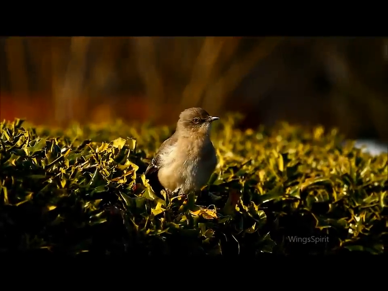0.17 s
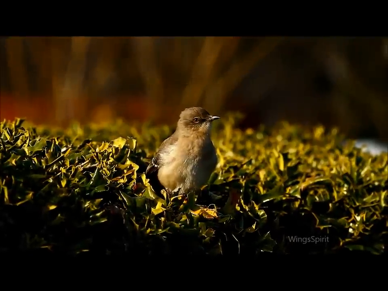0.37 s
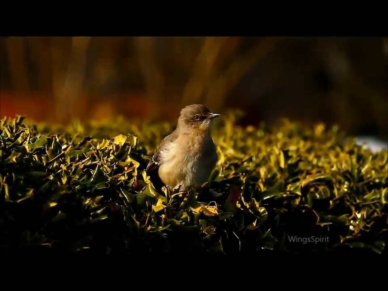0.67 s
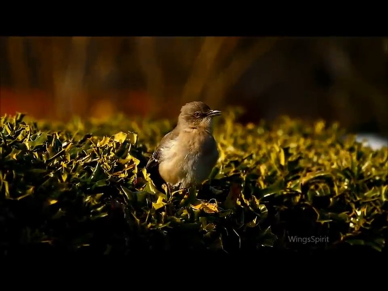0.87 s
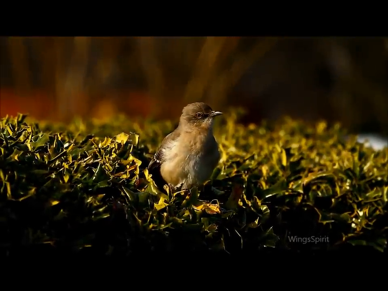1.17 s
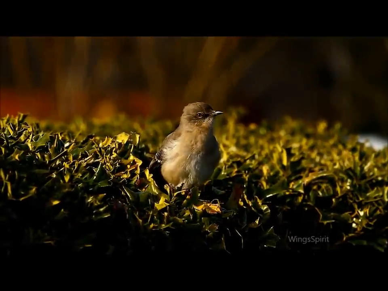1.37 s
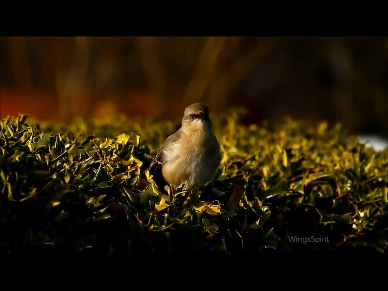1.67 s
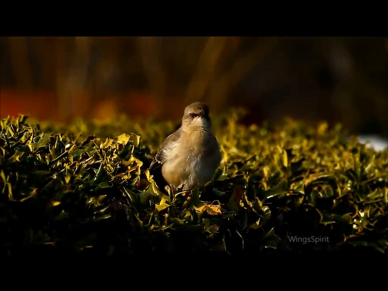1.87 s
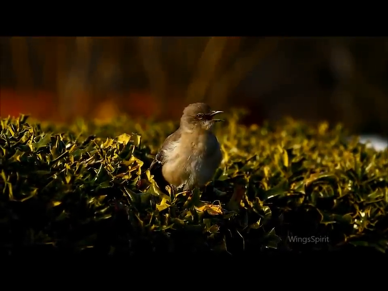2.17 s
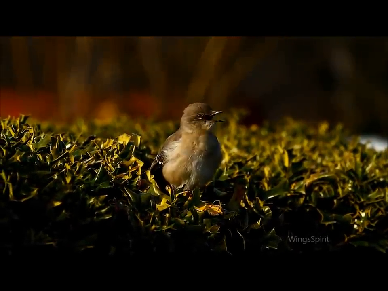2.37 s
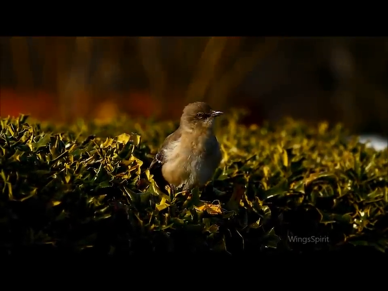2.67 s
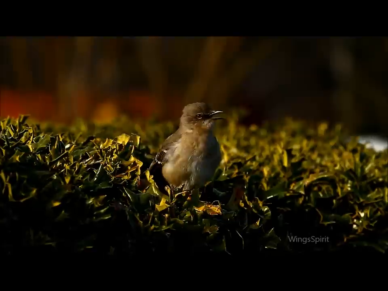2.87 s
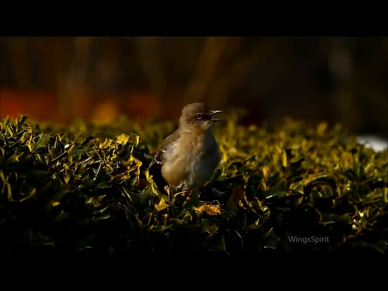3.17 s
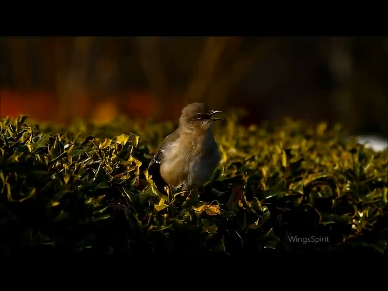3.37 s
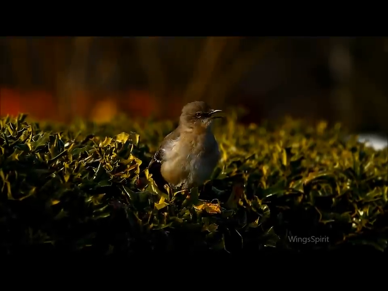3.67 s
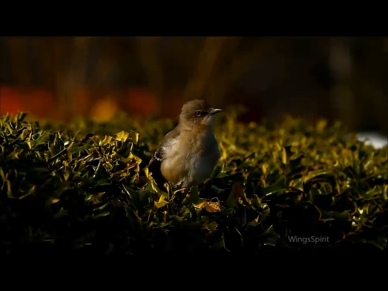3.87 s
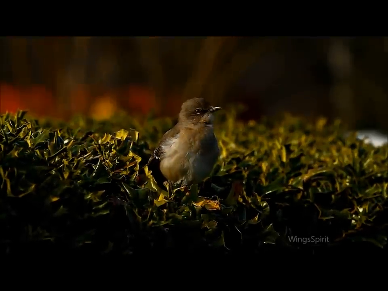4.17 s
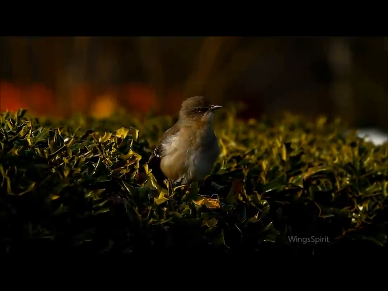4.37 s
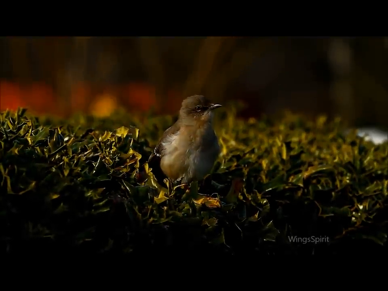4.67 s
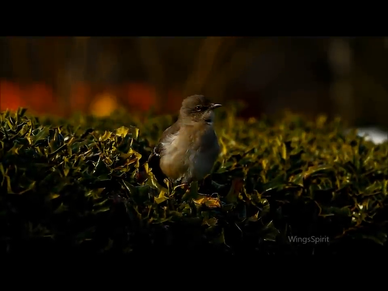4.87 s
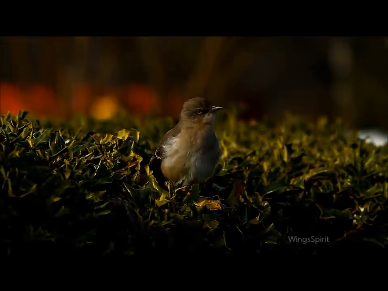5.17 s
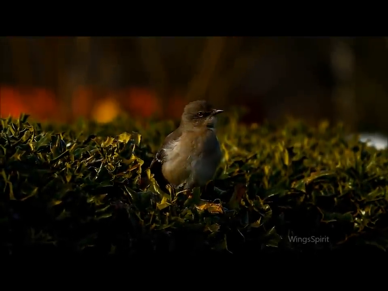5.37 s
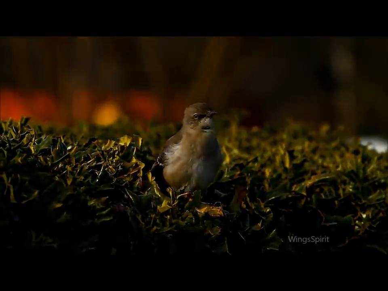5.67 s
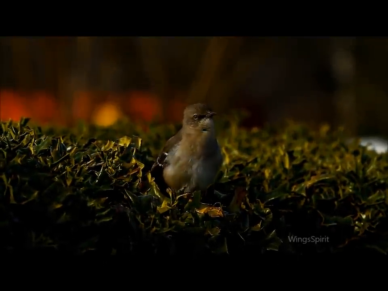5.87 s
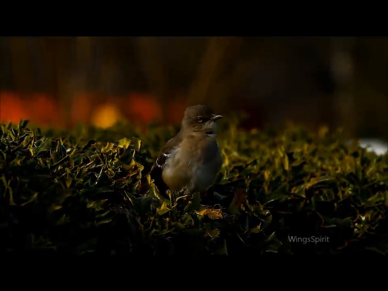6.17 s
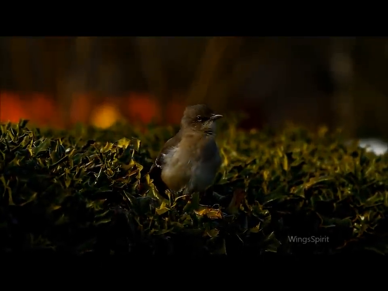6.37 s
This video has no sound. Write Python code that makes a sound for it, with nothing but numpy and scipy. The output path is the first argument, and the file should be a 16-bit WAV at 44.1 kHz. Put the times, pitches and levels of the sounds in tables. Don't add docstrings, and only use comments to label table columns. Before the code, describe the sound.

A close mockingbird sings from a hedge outdoors, over low traffic hum and wind rumble that weaken throughout. Very short, sharp falling chips sound at about 0.05, 0.35, 0.75, 1.25 and 1.55 seconds, with slurred whistles at 0.9-1.15 and 1.7-1.9. Wind thumps the microphone softly at 0.5-1.05; tiny twig ticks come near 0.6, and a thin, very high brake squeal swells around 1.4-1.5 and 1.8. From 2.0 to 3.8, five phrases of rapid, bright, arched pips follow, the first four ending in a downward slide. Light wind thumps return around 4.0-4.4. Two lower, husky fluttering warbles come at 4.1 and 4.5, then clear little coos leading into purrs at 4.9, 5.4 and 5.75. A twig snaps at 5.2. Two swooping, bouncing trills finish at 6.0-6.3 and 6.4-6.55, with a short leafy echo.

```python
import sys
import numpy as np
from scipy import signal
from scipy.io import wavfile
from scipy.ndimage import uniform_filter1d

SR = 44100
rng = np.random.default_rng(int(sys.argv[2]) if len(sys.argv) > 2 else 0)


def amplitude_ratio(level_db):
    exponent = np.asarray(level_db, float) / 20
    return 10 ** exponent


def int16_out(signal):
    q = np.round(np.clip(np.atleast_2d(signal).T, -1, 1) * 32767)
    wavfile.write(sys.argv[1], SR, q.astype(np.int16))


N = 287532

CHIP_PARTIALS = [-15, -22, -38]
LOW_VOICE_PARTIALS = [-23, -35.5, -45, -32, -40.5, -39]


def rms_one(x):
    return x / np.sqrt(np.mean(x ** 2) + 1e-20)


def drift(rate):
    r = np.exp(-80 * np.pi * rate / SR)
    slow = signal.lfilter([1], [1, -2 * r, r * r], rng.standard_normal(N // 40 + 2002))[2000:]
    return np.interp(np.arange(N) / 40, np.arange(len(slow)), rms_one(slow))


def coloured(spectrum, patchy_db):
    hz, level_db = np.transpose(spectrum)
    edges = np.geomspace(hz[0], hz[-1], round(3 * np.log2(hz[-1] / hz[0])))
    white = rng.standard_normal((2, N))
    together = drift(1.7)
    out = 0
    for k, (low, high) in enumerate(zip(edges, edges[1:])):
        bandpass = signal.butter(2, [low, high], "band", fs=SR, output="sos")
        band = signal.sosfilt(bandpass, white[k % 2])
        centre_db = np.interp(np.log(low * high) / 2, np.log(hz), level_db)
        flicker_db = patchy_db * (0.53 * together + drift(8.8))
        out = out + band * amplitude_ratio(centre_db + flicker_db)
    return rms_one(out)


def resonance(x, hz, width):
    r = np.exp(-np.pi * width / SR)
    poles = [1, -2 * r * np.cos(2 * np.pi * hz / SR), r * r]
    return signal.lfilter([(1 - r * r) / 2, 0, (r * r - 1) / 2], poles, x + 1e-18)


def add(track, start_s, piece):
    i = round(start_s * SR)
    track[i:i + len(piece)] += piece[:N - i]


def traffic_level_db():
    # (time [s], level [dB])
    departure = [(0, -32), (.6, -33), (1.07, -34.5), (1.8, -35), (2.65, -37.5), (3.43, -37.5), (3.7, -41),
                 (4.0, -38), (5.1, -39.5), (5.9, -43), (6.52, -43.5)]
    return np.interp(np.arange(N) / SR, *np.transpose(departure))


def traffic():
    # (frequency [Hz], density [dB per Hz])
    spectrum = [(120, -20.5), (200, -3.5), (300, -5.5), (668, -3.5), (929, -1.5), (1240, -6), (1730, -8.5),
                (2230, -17.5), (4990, -29), (5470, -33.5), (15800, -43.5)]
    return amplitude_ratio(traffic_level_db() + 1.5) * coloured(spectrum, patchy_db=0.2)


def drone():
    # (frequency [Hz], width [Hz], level [dB])
    bands = [
        (110.8, 3.9, -40),
        (170, 16, -41.5),
    ]
    out = np.zeros(N)
    for hz, width, level_db in bands:
        out += amplitude_ratio(level_db + 32) * rms_one(resonance(rng.standard_normal(N), hz, width))
    return out


def wind():
    # (frequency [Hz], density [dB per Hz])
    spectrum = [(12, -38.5), (20, -12.5), (43, -10), (107, 1), (161, -1), (195, -1.5), (227, -7),
                (330, -21.5), (430, -47), (730, -120)]
    # (time [s], half width [s], rise [dB])
    gusts = [
        (.65, 0.86, 5),
        (3.4, 0.26, 1),
        (4.5, 0.25, 3),
        (5.9, 0.67, 2.5),
    ]
    t = np.arange(N) / SR
    gust_db = -4 + sum(db * np.exp(-((t - s) / width) ** 2) for s, width, db in gusts)
    return amplitude_ratio(traffic_level_db() + gust_db) * (coloured(spectrum, patchy_db=0.5) + drone())


def syrinx(hz, size, overtones_db, breath_db, follow, husk=0., flicker_s=0.026):
    # (frequency [Hz], gain [dB])
    beak = [(3000, -15), (6500, 1), (9000, -2.5), (11500, -4), (13000, 12), (14500, 8), (16000, 5.5)]
    count = len(hz)
    shake = uniform_filter1d(rng.standard_normal(count), size=30) * 5.5
    hz = hz * (1 + husk * shake)
    phase = 2 * np.pi * np.cumsum(hz) / SR
    air = np.diff(rng.standard_normal(count + 2), n=2) / 2
    out = size * (np.sin(phase) + amplitude_ratio(breath_db) * air)
    steady = size.max() * (size / size.max()) ** np.clip(follow, .05, 1)
    beak_hz, beak_db = np.transpose(beak)
    knots = np.arange(count) / (flicker_s * SR)
    for k, level_db in enumerate(overtones_db, 2):
        flicker_db = 3.5 * np.interp(knots, np.arange(40), rng.standard_normal(40))
        gain = amplitude_ratio(level_db + flicker_db + np.interp(k * hz, beak_hz, beak_db))
        out += steady * gain * np.sin(k * phase + k) * (k * hz < .45 * SR)
    return out


def flutter(t, hz, size, n):
    # (rate [per s], upward spike [share], level dip [0-1], onset [s], overtone lift [dB])
    beats = [
        (70, 0.1, 0.7, 0.045, 4),
        (68.5, 0.15, 0.73, 0.01, 2.5),
        (59.3, 0.08, 0.78, 0.0055, -3),
        (48.7, 0.07, 0.7, 0.0071, 3),
        (62.6, .06, 0.5, 0.0162, -3),
    ]
    # (time [s], ..)
    catches = [
        [4.103, 4.116, 4.129, 4.143, 4.157, 4.175, 4.188, 4.202],
        [4.489, 4.505, 4.52, 4.537, 4.554, 4.572, 4.585, 4.6],
    ]
    per_s, spike, dip, onset_s, lift_db = beats[n]
    age = t - t[0]
    if n < len(catches):
        beat = 2 * np.pi * np.interp(t, catches[n], np.arange(len(catches[n])))
    else:
        slip = 0.7 * np.interp(age * per_s, np.arange(12), rng.standard_normal(12))
        beat = 2 * np.pi * per_s * age * (1.1 - 0.9 * age) + slip
    grown = np.minimum(1, (age / onset_s) ** 2)
    jump = spike * (np.cos(beat / 2 - .3) ** 8 - .15)
    hz = hz * (1 + grown * (0.014 * np.sin(beat) + jump))
    size = size * (1 - grown * np.clip(dip, 0, .98) * np.cos(beat / 2) ** 6)
    return hz, size, lift_db


def sing(notes, overtones_db, round_s, breath_db, follow, fluttering=False, husk=0., flicker_s=.012, waver=0.):
    out = np.zeros(N)
    for n, rows in enumerate(notes):
        s, turn_hz, turn_db = np.transpose(rows)
        t = np.arange(s[0], s[-1], 1 / SR)
        inertia = round(round_s * SR)
        hz = uniform_filter1d(np.interp(t, s, turn_hz), inertia, mode="nearest")
        level_db = uniform_filter1d(np.interp(t, s, turn_db), inertia, mode="nearest")
        if waver:
            knots = np.arange(0, t[-1] - t[0] + flicker_s, flicker_s)
            sharp, loud = (np.interp(t - t[0], knots, c) for c in rng.standard_normal((2, len(knots))))
            hz = hz * (1 + waver * sharp)
            level_db = level_db + 1.8 * loud
        size = amplitude_ratio(level_db) * np.minimum(1, np.minimum(t - t[0], t[-1] - t) / .002)
        lift_db = 0
        if fluttering:
            hz, size, lift_db = flutter(t, hz, size, n)
        add(out, s[0], syrinx(hz, size, np.add(overtones_db, lift_db), breath_db, follow, husk, flicker_s))
    return out


def shaped(shape, start_s, stretch, high_hz, low_hz, peak_db):
    return [(start_s + stretch * t, low_hz + share * (high_hz - low_hz), peak_db + db) for t, share, db in shape]


def chips():
    # (time [s], pitch [Hz], peak level [dB])
    turns = [
        [(.051, 3300, -27), (.055, 3950, -19), (.059, 5430, -25), (.063, 6092, -19), (.066, 5400, -30),
         (.069, 4180, -16), (.075, 3830, -21), (.083, 3160, -32), (.088, 3070, -40)],
        [(.331, 2800, -33), (.336, 4180, -24), (.341, 5946, -26), (.345, 6700, -23), (.349, 5930, -21.5),
         (.353, 4710, -12), (.358, 4160, -14.5), (.364, 3840, -19.5), (.373, 3820, -30)],
        [(.741, 3215, -30), (.746, 4200, -21), (.751, 5930, -21), (.755, 6540, -24.5), (.758, 5740, -23.5),
         (.761, 4300, -16), (.766, 4180, -11), (.771, 3510, -18.5), (.777, 3440, -38)],
        [(1.238, 2780, -26.5), (1.244, 4286, -19.5), (1.248, 4610, -21), (1.253, 6500, -24.5),
         (1.257, 5280, -15), (1.261, 4360, -14), (1.266, 3870, -15), (1.272, 3520, -26), (1.278, 3530, -38)],
        [(1.546, 2940, -31), (1.551, 4230, -23), (1.555, 5680, -32), (1.559, 6200, -24), (1.563, 5234, -25),
         (1.567, 4060, -14.5), (1.575, 3760, -20), (1.582, 3300, -30), (1.587, 3300, -39.5)],
    ]
    # (delay [s], level [dB])
    leaves = [
        (.0032, -7),
        (.0057, -11),
    ]
    direct = sing(turns, CHIP_PARTIALS, round_s=.003, breath_db=-24, follow=.85, husk=.012, flicker_s=.002)
    return direct + sum(amplitude_ratio(db) * np.roll(direct, round(lag * SR)) for lag, db in leaves)


def second_voice():
    # (start [s], length [s], high [Hz], low [Hz], peak level [dB])
    falls = [
        (0.062, 0.0079, 3930, 2770, -16),
        (0.347, 0.0075, 4450, 3370, -16),
        (.756, 0.0074, 4250, 2416, -18.5),
        (1.561, .006, 3920, 3000, -25),
        (1.678, 0.02, 3490, 3210, -27),
    ]
    # (share of length [0-1], share of pitch range [0-1], level re peak [dB])
    contour = [(0, 0.83, -7.5), (1, 0.29, 1.5)]
    notes = [shaped(contour, *row) for row in falls]
    return sing(notes, CHIP_PARTIALS[1:], round_s=.003, breath_db=-24, follow=1, husk=.04)


def whines():
    # (start [s], end [s], frequency [Hz], peak level [dB])
    slivers = [(0.081, 0.118, 11800, -52), (1.357, 1.475, 15200, -56), (1.39, 1.46, 14000, -57),
               (1.411, 1.508, 5140, -55), (0.459, .48, 12040, -48), (0.563, 0.638, 8700, -56),
               (0.67, 0.71, 10400, -50), (.67, 0.69, 12700, -51), (1.76, 1.814, 4500, -46),
               (0.708, 0.738, 11700, -46), (1.152, 1.207, 11370, -49), (1.318, 1.371, 11500, -45),
               (1.467, 1.52, 12760, -44), (1.62, 1.663, 11850, -52), (1.76, 1.81, 11600, -44),
               (1.83, 1.87, 12700, -54), (3.76, 3.776, 12000, -56), (5.868, 5.927, 11950, -59)]
    out = np.zeros(N)
    for start, end, hz, peak_db in slivers:
        t = np.arange(0, end - start, 1 / SR)
        wander = np.cumsum(rng.normal(0, .04, len(t)))
        add(out, start, amplitude_ratio(peak_db) * np.sqrt(np.hanning(len(t))) * np.sin(2 * np.pi * hz * t + wander))
    return out


def pressure_swing(hz, cycles):
    push, cycles = np.sign(cycles), abs(cycles)
    turns = np.arange(-2 * cycles, 2 * cycles, hz / SR)
    wave = 1.15 * np.cos(2 * np.pi * turns) + 0.28 * np.cos(4 * np.pi * turns)
    return push * np.exp(-(2 * turns / cycles) ** 2) * wave


def thumps():
    # (time [s], peak level [dB], frequency [Hz], signed length [cycles])
    gust_hits = [(0.495, -22.5, 151, -2.5), (.611, -15.5, 123, 0.5), (0.624, -24, 90, 3),
                 (0.675, -21, 230, 2.5), (.69, -15, 189, 1.5), (0.818, -24.5, 103, -1.6),
                 (.852, -25.5, 70, -1.1), (1.05, -14.5, 170, -1.2), (1.058, -27, 85, -2),
                 (3.955, -23, 146, 1.24), (4.053, -21.5, 170, 1.8), (4.063, -21.5, 132, 1.2),
                 (4.073, -19, 120, 0.7), (4.4, -26, 97.5, 1.4)]
    out = np.zeros(N)
    for s, peak_db, hz, cycles in gust_hits:
        add(out, s - 2 * abs(cycles) / hz, amplitude_ratio(peak_db) * pressure_swing(hz, cycles))
    return out


def ticks():
    # (time [s], peak level [dB], frequency [Hz])
    snaps = [
        (5.204, -30, 5200),
        (.561, -36, 4800),
        (.581, -35, 5000),
        (.652, -38, 6500),
        (6.491, -43, 6000),
    ]
    out = np.zeros(N)
    for s, peak_db, hz in snaps:
        add(out, s - 2 * 2.5 / hz, amplitude_ratio(peak_db) * pressure_swing(hz, 2.5))
    return out


def whistles():
    # (time [s], pitch [Hz], rms level [dB])
    turns = [
        [(0.855, 3560, -41.5), (0.863, 3560, -29.5), (0.881, 3734, -23.5), (0.933, 3390, -31.5),
         (0.961, 3374, -38), (0.997, 3470, -36), (1.089, 3820, -23), (1.135, 3958, -24.5), (1.155, 3750, -46)],
        [(1.676, 4140, -45), (1.684, 4060, -25), (1.714, 3830, -25.5), (1.742, 3520, -28.5), (1.76, 3416, -33),
         (1.836, 3510, -43.5), (1.864, 3450, -36.5), (1.89, 3360, -40.5), (1.905, 3260, -48)],
    ]
    partials = [-17.5, -27.5, -42.5]
    return np.sqrt(2) * sing(turns, partials, round_s=.012, breath_db=-33, follow=.9, husk=.003,
                             flicker_s=.015, waver=.005)


def squeal():
    # (time [s], hold [s], rms level [dB], rise [dB per s], fall [dB per s])
    bites = [
        (1.33, .03, -44.5, 500, 400),
        (1.401, 0.1234, -31, 233, 169),
        (1.462, 0.0033, -21.5, 230, 263),
        (1.779, .01, -32.5, 82, 604),
        (1.86, 0.0078, -45, 300, 703),
        (1.95, 0.028, -54, 150, 402),
    ]
    t = np.arange(N) / SR
    level_db = np.where((t > 1.0) & (t < 2.0), -70, -120)
    for s, hold, top_db, rise, fall in bites:
        below_db = np.maximum(0, np.maximum(rise * (s - t), fall * (t - s - hold)))
        level_db = np.maximum(level_db, top_db - below_db)
    hz = 9027 + 4.0 * drift(6.0)
    return np.sqrt(2) * amplitude_ratio(level_db) * np.sin(2 * np.pi * np.cumsum(hz) / SR)


def pips():
    # (time [s], pitch [Hz], rms level [dB])
    slides = [
        [(2.136, 4580, -20.5), (2.144, 4800, -28), (2.158, 5070, -15), (2.17, 5160, -23), (2.186, 5020, -17.5),
         (2.256, 4320, -36), (2.262, 4200, -28.5), (2.31, 3830, -39.5), (2.322, 3940, -48.5)],
        [(2.496, 4420, -30), (2.512, 5020, -18), (2.522, 4990, -15), (2.536, 5023, -13.5), (2.55, 4760, -24.5),
         (2.588, 4690, -26.5), (2.634, 4021, -32.5), (2.642, 4036, -47)],
        [(2.912, 4820, -33.5), (2.922, 4950, -23), (2.934, 5042, -17), (2.948, 5010, -17.5), (2.964, 4820, -26),
         (3.0, 4479, -28), (3.012, 4326, -43.5), (3.024, 4290, -31.5), (3.043, 3980, -43.5)],
        [(3.318, 4590, -33), (3.352, 4680, -31), (3.36, 4950, -26.5), (3.382, 4480, -27), (3.402, 4480, -32.5),
         (3.422, 4140, -27), (3.434, 4050, -40), (3.454, 3788, -36.5), (3.465, 3900, -45)],
    ]
    # (top [s], length [s], top [Hz], depth [Hz], peak level [dB])
    arches = [(2.006, 0.041, 4980, 830, -9.5), (2.061, 0.044, 4990, 826, -11),
              (2.114, 0.053, 5067, 656, -9), (2.415, 0.041, 4960, 750, -9.5), (2.471, 0.043, 5030, 740, -8),
              (2.7538, 0.038, 5004, 626, -9.5), (2.816, 0.029, 5005, 517, -5.5),
              (2.876, 0.033, 5027, 443, -8), (3.183, 0.041, 5010, 760, -10.5),
              (3.241, 0.043, 5038, 710, -10), (3.297, 0.053, 5040, 497, -11),
              (3.601, 0.037, 5010, 620, -9.5), (3.663, 0.042, 5093, 710, -12),
              (3.7341, 0.033, 5010, 600, -9), (3.797, 0.036, 4987, 563, -15)]
    # (time [s], 2nd overtone [dB], 3rd overtone [dB])
    gapes = [
        (2.15, -19.5, -27),
        (2.5, -16.5, -28),
        (2.9, -21, -40),
        (3.3, -15.5, -23.5),
        (3.7, -17, -29),
    ]

    def gape(s):
        return min(gapes, key=lambda row: abs(row[0] - s))[1:]

    out = np.zeros(N)
    for slide in slides:
        out += np.sqrt(2) * sing([slide], gape(slide[2][0]), round_s=.004, breath_db=-46, follow=.7,
                                 flicker_s=.008, husk=.003)
    climb_share = 0.49
    for top_s, length, top_hz, depth_hz, peak_db in arches:
        t = np.arange(0, length, 1 / SR)
        start = top_s - climb_share * length
        arc = t / length - climb_share
        climb = np.abs(arc / climb_share) ** 2.28
        fall = (arc / (1 - climb_share)) ** 2
        hz = top_hz - depth_hz * np.where(arc < 0, climb, fall)
        swell, fade = np.maximum(0, 1 - t / .02), np.maximum(0, 1 - (t[-1] - t) / .021)
        edges = swell ** 2.6 + fade ** 2.6
        size = amplitude_ratio(peak_db - 30 * edges) * np.minimum(1, np.minimum(t, t[-1] - t) / .002)
        add(out, start, syrinx(hz, size, np.add(gape(start), -8), breath_db=-34, follow=.55, husk=.003,
                               flicker_s=.006))
    return out


def far_squeal():
    # (start [s], end [s], frequency [Hz], width [Hz], rms level [dB])
    brake = (2.9, 4.05, 3200, 90, -67)
    start, end, hz, width, level_db = brake
    share = np.clip((np.arange(N) / SR - start) / (end - start), 0, 1)
    band = resonance(resonance(rng.standard_normal(N), hz, width), hz, width)
    return amplitude_ratio(level_db + 3 * drift(5)) * np.sqrt(np.abs(np.sin(np.pi * share))) * rms_one(band)


def warbles():
    # (time [s], pitch [Hz], peak level [dB])
    rising = [
        [(4.09, 1770, -41), (4.1, 2079, -30), (4.112, 2268, -26), (4.138, 2427, -24.5), (4.189, 2514, -31.5),
         (4.205, 2090, -34)],
        [(4.49, 1900, -43), (4.499, 2026, -25), (4.54, 2376, -27), (4.556, 2570, -25.5), (4.575, 2520, -30.5),
         (4.605, 2190, -31)],
    ]
    # (start [s], length [s], high [Hz], low [Hz], peak level [dB])
    purrs = [
        (4.965, 0.085, 2137, 1915, -24.5),
        (5.478, 0.09, 2164, 2000, -24.5),
        (5.806, 0.089, 2116, 1887, -23),
    ]
    # (share of length [0-1], share of pitch range [0-1], level re peak [dB])
    contour = [(0, 0.94, -15), (.2, 0.807, -4.5), (.33, .65, -0.5), (.78, .2, -1), (1, 0.0063, -16)]
    notes = rising + [shaped(contour, *row) for row in purrs]
    return sing(notes, LOW_VOICE_PARTIALS, round_s=.006, breath_db=-32, follow=.9, fluttering=True, husk=.011,
                flicker_s=.006, waver=.012)


def rasps():
    # (time [s], pitch [Hz], peak level [dB])
    breaks = [
        [(4.195, 2624, -31), (4.208, 2910, -40), (4.224, 2960, -56)],
        [(4.55, 3300, -43), (4.59, 3250, -52), (4.612, 2600, -34), (4.638, 2730, -52)],
    ]
    return sing(breaks, [], round_s=.005, breath_db=-24, follow=.9, husk=0.13)


def coos():
    # (start [s], length [s], high [Hz], low [Hz], peak level [dB])
    falling = [
        (4.888, .062, 2235, 1790, -29),
        (5.41, 0.064, 2110, 1860, -30),
        (5.742, 0.061, 2210, 1838, -27.5),
    ]
    # (share of length [0-1], share of pitch range [0-1], level re peak [dB])
    contour = [(0, 0.96, -18), (.18, 0.41, -1.5), (.4, 0.21, 0.5), (.72, .07, -4.5), (1, 0.068, -10.5)]
    notes = [shaped(contour, *row) for row in falling]
    return sing(notes, np.add(LOW_VOICE_PARTIALS, -15), round_s=.006, breath_db=-32, follow=.9, husk=.007)


def trills():
    # (top [s], top [Hz], peak level [dB], first wave [Hz], end [s])
    bouncing = [
        (6.0445, 3063, -25, 550, 6.316),
        (6.378, 3226, -25, 543, 6.55),
    ]
    # (time from top [s], share of pitch range [0-1], level re peak [dB])
    contour = [(-.009, 0.48, -4), (-.003, 0.91, -1), (0, 0.95, 0.5), (.008, .7, 1), (.015, .32, -7.5),
               (.021, 0, -14)]
    partials = [-19.5, -32, -40, -30, -40, -36]
    trough_hz, last_wave_hz, shrink_s = 1947, 230, .08
    swoops, waves = [], []
    for top_s, top_hz, peak_db, first_hz, end in bouncing:
        swoop = shaped(contour, top_s, 0.89, top_hz, trough_hz, peak_db)
        start = swoop[-1][0]
        age = np.arange(0, end - start, .001)
        turns = 25.6 * age * (1 - 0.394 * age)
        fresh = np.exp(-age / shrink_s)
        height_hz = last_wave_hz + (first_hz - last_wave_hz) * fresh / np.exp(-.02 / shrink_s)
        bounce = np.sin(np.pi * (turns % 1) ** 1.15) ** 2
        hz = trough_hz + 90 * fresh + height_hz * bounce
        loud_turn = .16 + (.6 - .16) * fresh ** 2
        throb_db = 6 * (1 - fresh / 2) * np.cos(2 * np.pi * (turns - loud_turn))
        voice_break = np.cos(np.pi * (turns - 0.818)) ** 16
        fade = np.exp((age - age[-1]) / .01)
        level_db = peak_db - 10.5 + (1 - fresh) + throb_db - 1.5 * (voice_break + fade)
        swoops.append(swoop)
        waves.append(np.transpose([start + age, hz, level_db]))
    out = sing(swoops, np.add(partials, -5), round_s=.003, breath_db=-36, follow=.6)
    return out + sing(waves, np.add(partials, -3.5), round_s=.003, breath_db=-36, follow=.4, husk=.004)


def garden(x):
    t = np.arange(SR // 2) / SR
    near, far = rng.standard_normal((2, len(t)))
    near = signal.lfilter([.35], [1, -.65], near) * amplitude_ratio(-60 * t / .11) * (t > .003)
    far = signal.lfilter([.4], [1, -.6], far) * amplitude_ratio(-60 * t / 1) * (t > .02)
    echo = amplitude_ratio(-16.5) * near / np.linalg.norm(near) + amplitude_ratio(-39.5) * far / np.linalg.norm(far)
    return signal.fftconvolve(x, echo)[:N]


def scene():
    chipping = chips()
    bird = chipping + second_voice() + whistles() + pips() + warbles() + rasps() + coos() + trills()
    into_hedge = bird + (amplitude_ratio(5) - 1) * chipping
    brakes = whines() + squeal() + far_squeal()
    mix = bird + garden(into_hedge) + brakes + traffic() + wind() + thumps() + ticks()
    return mix[None]


def top_cut(x):
    return signal.sosfilt(signal.butter(12, 15940, fs=SR, output="sos"), x)


def record(dry):
    lowpass = signal.cheby2(12, 60, 16200, fs=SR, output="sos")
    mix = signal.sosfilt(lowpass, dry)
    return top_cut(mix)


dry = scene()
out = record(dry)
int16_out(out)
```